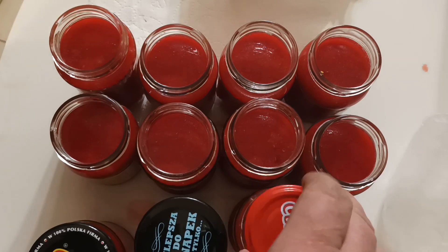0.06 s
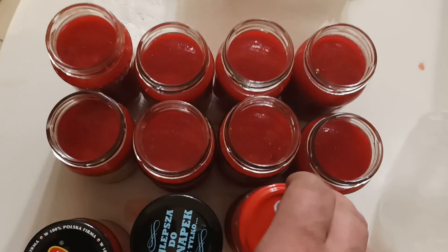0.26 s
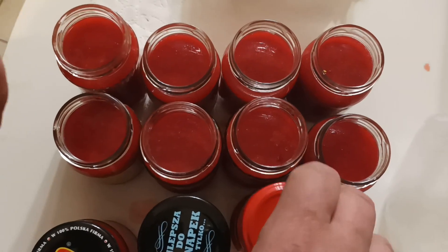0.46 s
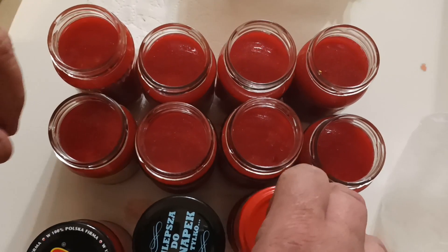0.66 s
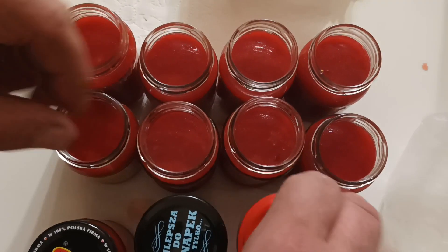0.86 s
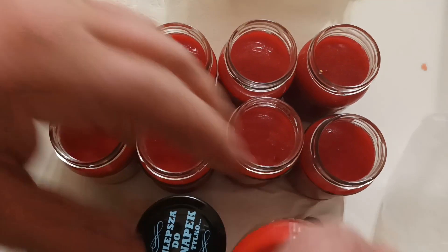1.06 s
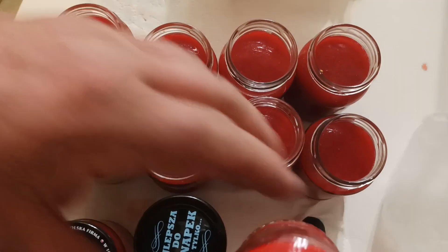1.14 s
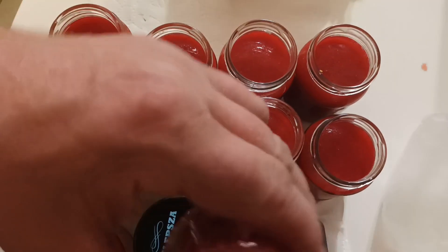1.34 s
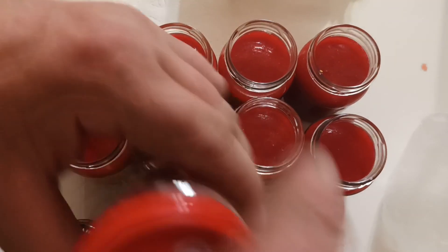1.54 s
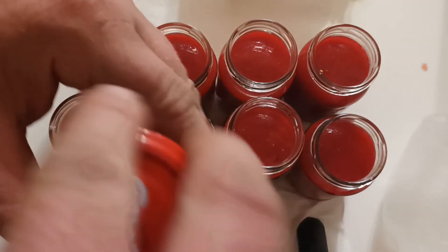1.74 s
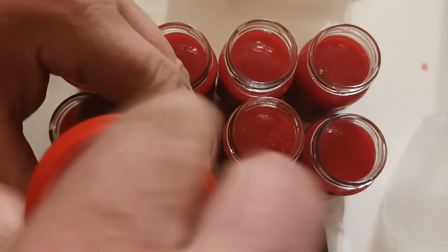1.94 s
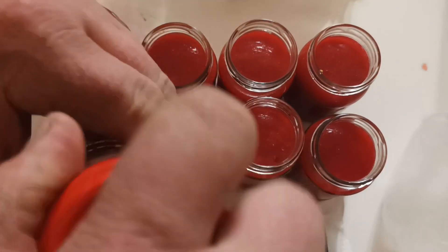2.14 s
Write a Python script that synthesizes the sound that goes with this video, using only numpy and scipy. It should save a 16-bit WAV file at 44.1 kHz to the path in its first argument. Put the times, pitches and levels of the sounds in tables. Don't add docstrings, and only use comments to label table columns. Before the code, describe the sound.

A tin lid clatters onto a small full glass jar, then is twisted on with hollow clicks

```python
import sys
import numpy as np
from scipy import signal
from scipy.fft import rfft, irfft
from scipy.io import wavfile
from scipy.ndimage import map_coordinates

SR = 44100
rng = np.random.default_rng(int(sys.argv[2]) if len(sys.argv) > 2 else 0)


def gain_from_decibels(decibels):
    exponent = np.asarray(decibels, float) / 20
    return 10 ** exponent


def int16_out(signal):
    q = np.round(np.clip(np.atleast_2d(signal).T, -1, 1) * 32767)
    wavfile.write(sys.argv[1], SR, q.astype(np.int16))


N = 97020
RIM_HZ = 3060
DROP_LAG_S, CATCH_LAG_S = 0.00012, 0.00024
DROP_PAN_DB, CATCH_PAN_DB = -1.5, 4


def unit(x):
    return x / np.sqrt(np.mean(x ** 2))


def band(x, hz, width_hz):
    return signal.lfilter(*signal.iirpeak(min(hz, .45 * SR), hz / width_hz, fs=SR), x)


def low(x, hz):
    return signal.sosfilt(signal.butter(2, hz, fs=SR, output="sos"), x)


def high(x, hz):
    return signal.sosfilt(signal.butter(2, hz, "high", fs=SR, output="sos"), x)


def noise(*shape):
    return rng.standard_normal(shape)


def seconds(count):
    return np.arange(count) / SR


def curve(points):
    return gain_from_decibels(np.interp(seconds(N), *np.array(points).T))


def ports(x, pan_db, lag_s):
    late = map_coordinates(x, [np.arange(len(x)) - lag_s * SR], order=3)
    return np.array([x * gain_from_decibels(pan_db / 2), late * gain_from_decibels(-pan_db / 2)])


def add(out, s, sound):
    i = int(s * SR)
    out[..., i:i + sound.shape[-1]] += sound[..., :N - i]


def blip(hz, die_s):
    t = seconds(SR // 20)
    return np.e * t / die_s * np.exp(-t / die_s) * np.sin(2 * np.pi * hz * t)


def knocks(contacts, die_s, lag_s, pan_db):
    out = np.zeros(N)
    for s, peak_db, hz in contacts:
        add(out, s, gain_from_decibels(peak_db + 3.5) * (blip(hz, die_s) + 0.058 * blip(0.74 * hz, 3.8 * die_s)))
    return ports(high(high(out, 647), 647), pan_db, lag_s)


def lid_drop():
    # t/s, peak level/dB, hollow pitch f/Hz
    drops = [(0.041, -27, 1323), (0.0415, -30.5, 720), (0.097, -39, 1270), (0.15, -48, 1250),
             (0.17, -41.5, 1550), (0.183, -43, 890), (0.187, -41, 1000), (0.192, -37, 1220),
             (0.212, -13.5, 1360), (0.2135, -19.5, 860), (0.216, -19.5, 1025), (0.217, -20.5, 1250),
             (0.2195, -27.5, 980), (0.23, -15, 1367), (0.237, -21.5, 1040), (0.24, -27, 1390),
             (0.242, -24, 920), (0.25, -37, 930), (0.338, -16.5, 1213), (0.388, -59, 1240),
             (0.417, -39, 1170), (0.446, -17, 987), (0.502, -41, 1050), (0.672, -49, 1180),
             (0.69, -50, 1210), (0.72, -50, 1060), (0.738, -49.5, 1260), (0.8, -49, 900),
             (0.935, -51, 1000)]
    return knocks(drops, 0.0011, DROP_LAG_S, DROP_PAN_DB)


def thread_catches():
    # t/s, peak level/dB, hollow pitch f/Hz
    catches = [(1.193, -42, 950), (1.259, -32.5, 943), (1.414, -40.5, 1020), (1.471, -70, 900),
               (1.481, -34, 1150), (1.486, -27.5, 1225), (1.492, -29.5, 986), (1.497, -46, 1040),
               (1.505, -63, 1090), (1.529, -62, 958), (1.637, -20.5, 1086), (1.65, -21, 1180),
               (1.701, -23.5, 1070), (1.705, -23.5, 850), (1.714, -21, 1180), (1.718, -23, 1084),
               (1.725, -11.5, 934), (1.737, -20, 1030), (1.744, -20.5, 920), (1.765, -49, 880),
               (1.772, -28, 990), (1.787, -25, 830), (1.794, -31.5, 854), (1.883, -36, 900),
               (1.888, -25.5, 1070), (1.895, -18.5, 884), (1.904, -18, 870), (1.91, -15.5, 890),
               (1.917, -20, 903), (1.921, -24.5, 885), (1.931, -17.5, 1007), (1.935, -19, 1253),
               (1.964, -46, 1160)]
    return knocks(catches, 0.0012, CATCH_LAG_S, CATCH_PAN_DB)


def strike_tin(blows, modes, crack_db, wash_db, wash_t60_s=0.41):
    shimmer_db, shimmer_width_hz = 11, 300
    out, t = np.zeros((2, N)), seconds(SR // 3)
    hz, db, t60_s = np.array(modes).T[:, :, None]
    for (s, peak_db, ring), chance in zip(blows, noise(len(blows), 4, len(modes), 1)):
        weight, *phases, detune = chance
        fade = gain_from_decibels(db + 1.5 * weight - 60 * t / np.clip(t60_s * ring, .01, .3))
        for ear, phase in enumerate(phases):
            pair = np.sin(2 * np.pi * hz * t + phase)
            pair = pair + 0.32 * np.sin(2 * np.pi * hz * (1 + 0.0058 * detune) * t)
            blur = [band(v, f, shimmer_width_hz) for v, f in zip(noise(*pair.shape), hz[:, 0])]
            rung = np.sum(fade * (pair + gain_from_decibels(shimmer_db) * np.array(blur)), axis=0)
            add(out[ear], s, gain_from_decibels(peak_db - 8.5) * rung * np.minimum(t / 0.00053, 1))
        crack = gain_from_decibels(crack_db - 60 * t / 0.0069) + gain_from_decibels(wash_db - 60 * t / (wash_t60_s * ring))
        add(out, s, gain_from_decibels(peak_db) * crack * band(noise(2, len(t)), 5000, 10000))
    return out


def clinks():
    # t/s, peak level/dB, ring share [0-1]
    blows = [
        (0.2111, -20, 0.98),
        (0.2297, -39, 0.6),
        (0.2356, -27.5, 0.87),
        (0.4475, -39.5, 0.08),
    ]
    # f/Hz, level/dB, t60/s
    modes = [(1876, -13, 0.23), (2220, -11, 0.12), (2963, -4.5, 0.13), (3087, -9.5, 0.41),
             (3295, -13, 0.13), (4530, -12.5, 0.2), (5440, -1.5, 0.1), (5884, -16, 0.26),
             (6620, -12.5, 0.18), (7370, -5, 0.11), (9080, -20.5, 0.26), (10800, -8, 0.078),
             (11300, -17, 0.26), (13780, -19, 0.062)]
    return strike_tin(blows, modes, crack_db=-13, wash_db=-20.5)


def first_touch():
    # t/s, peak level/dB, ring share [0-1]
    blows = [
        (0.0414, -28, 0.48),
    ]
    # f/Hz, level/dB, t60/s
    modes = [(865, -17, 0.24), (1693, -0.5, 0.26), (2150, 0, 0.064), (2870, 2, 0.1), (4650, 0.5, 0.079),
             (5360, 2.5, .1), (5860, -14, 0.19), (5992, -11, 0.19), (7170, -8.5, 0.2), (11000, 0.5, 0.083),
             (11090, -17.5, 0.16), (14000, -9, 0.1)]
    return strike_tin(blows, modes, crack_db=-17, wash_db=-18.5)


def dome():
    # t/s, peak level/dB
    blows = [
        (0.0423, -55.5),
        (0.2115, -33),
        (0.2289, -38),
        (0.339, -45),
        (0.444, -49.5),
    ]
    # f/Hz, level/dB, t60/s
    modes = [(150.3, -11.5, 0.32), (212.4, -10, 0.24), (917, -5, 0.27), (996, 2, 0.31), (1090, -1, .26),
             (1335, -3.5, 0.47), (1510, -2, 0.16), (1624, -19, .25)]
    out, t = np.zeros(N), seconds(SR // 2)
    hz, db, t60_s = np.array(modes).T[:, :, None]
    for (s, peak_db), (weight, phase) in zip(blows, noise(len(blows), 2, len(modes), 1)):
        fade = gain_from_decibels(peak_db + db + 2.0 * weight - 60 * t / t60_s)
        hum = np.sum(fade * np.sin(2 * np.pi * hz * t + phase), axis=0)
        add(out, s, hum * np.minimum(t / 0.0036, 1))
    return ports(out, DROP_PAN_DB, DROP_LAG_S)


def grind():
    # t/s, level/dB
    effort = [(0, -69), (.05, -81), (.2, -50), (.215, -30), (.33, -43), (.5, -51.5), (.75, -64),
              (1.05, -67.5), (1.4, -65.5), (1.48, -45.5), (1.56, -70), (1.66, -41.5), (1.72, -38),
              (1.8, -47), (1.87, -54), (1.91, -34), (1.97, -46.5), (2.06, -102)]
    # f/Hz, width/Hz, level/dB
    hollow_modes = [(902, 54, 15.5), (1031, 145, 11.5), (1270, 35, 12.5)]
    slips_per_s, spread_db, grit_db = 1100, 4, -23
    slips = (rng.random(N) < slips_per_s / SR) * gain_from_decibels(spread_db * noise(N)) * np.sign(noise(N))
    hollow = sum(gain_from_decibels(db) * band(band(slips, hz, width_hz), hz, 530) for hz, width_hz, db in hollow_modes)
    hollow = high(hollow, 690)
    grit = band(band(slips, RIM_HZ, 55), RIM_HZ, 320)
    return ports(curve(effort) * (unit(hollow) + gain_from_decibels(grit_db) * unit(grit)), 2.2, CATCH_LAG_S)


def ticks():
    # t/s, peak level/dB, f/Hz
    scrapes = [(.171, -46.5, 2250), (.503, -50.5, 2300), (0.543, -39, 2000), (.582, -67, 9500),
               (.593, -47, 2390), (.858, -64, 6760), (1.272, -64, 6300), (1.297, -58, 6900),
               (1.486, -50, 5170), (1.635, -66, 5900), (1.649, -44.5, 6200), (1.648, -48, 3300),
               (1.695, -48, 2220), (1.717, -50, 5600), (1.724, -31.5, 3080), (1.7236, -37, 4380),
               (1.723, -38, 6000), (1.738, -41, 6200), (1.911, -46, 2480), (1.915, -52, 6030),
               (1.925, -45, 5670), (1.932, -40, 2320), (1.941, -48.5, 6800), (1.947, -39, 2270),
               (1.969, -46, 2400), (2.052, -46, 2880), (2.136, -51, 9100)]
    # t/s, peak level/dB, t60/s
    rim_rings = [
        (.545, -59, .5),
        (.595, -62, .4),
        (1.655, -57, .15),
        (1.737, -47, .3),
        (1.91, -56, .15),
    ]
    out, t = np.zeros(N), seconds(SR // 6)
    for s, peak_db, hz in scrapes:
        grit = noise(len(t)) * gain_from_decibels(-60 * t / .012) * np.minimum(t / 0.00068, 1)
        tick = band(band(grit, hz, 930), hz, 1400)
        tick = tick + .5 * band(band(grit, RIM_HZ, 30), RIM_HZ, 800)
        tick = tick + hz / 60000 * band(grit, 7600, 4000)
        add(out, s, gain_from_decibels(peak_db + 9.5) * tick / np.abs(tick).max())
    for s, peak_db, t60_s in rim_rings:
        pair = np.sin(2 * np.pi * RIM_HZ * t) + 0.78 * np.sin(2 * np.pi * 0.89 * RIM_HZ * t)
        add(out, s, gain_from_decibels(peak_db - 60 * t / t60_s) * pair * np.minimum(t / 0.0026, 1) * (1 - t / t[-1]))
    return ports(out, -0.63, .0001)


def snaps():
    # t/s, peak level/dB, centre f/Hz, rustle level/dB, rustle t60/s
    table = [
        (1.104, -55, 2150, -22, 0.24),
        (1.106, -43.5, 680, -6, 0.23),
        (1.184, -56, 11000, -18, .1),
        (1.3156, -30, 8800, -16, 0.28),
        (2.053, -42.5, 2460, -4, 1.4),
        (2.14, -16.5, 11000, -22.5, 0.31),
    ]
    die_s, edge_db, edge_s = 0.0066, -4.5, .004
    out, t = np.zeros((2, N)), seconds(SR // 2)
    for s, peak_db, hz, rustle_db, t60_s in table:
        crack = band(band(noise(len(t)) * gain_from_decibels(-60 * t / die_s), hz, 0.45 * hz), hz, 0.45 * hz)
        edge = high(high(noise(len(t)), 8500), 9000) * gain_from_decibels(edge_db - 60 * t / edge_s)
        crack = crack / np.abs(crack).max() + hz / 11000 * edge
        hiss = noise(3, len(t))
        hiss = hiss[:2] + hiss[2]
        hiss = hiss * gain_from_decibels(2.34 * unit(low(noise(len(t)), 110)))
        top_hz = 3000 + 0.45 * hz
        rustle = 0.87 * band(band(hiss, hz, .5 * hz), hz, hz)
        rustle = rustle + 1.15 * low(low(band(hiss, 3040, 5100), top_hz), top_hz)
        rustle = rustle + 1.93 * band(hiss, 580, 390)
        rustle = rustle + hz / 16000 * high(high(hiss, 11500), 11500)
        rustle = rustle * gain_from_decibels(rustle_db - 60 * t / t60_s) * np.minimum(t / 0.001, 1)
        crack = ports(crack / np.abs(crack).max(), 6.4, 0.00015)
        add(out, s, gain_from_decibels(peak_db + 1.5) * (crack + rustle))
    return out


def thumps():
    # t/s, peak level/dB, f/Hz
    blows = [(0.041, -40, 320), (0.171, -41.5, 410), (0.212, -23, 540), (0.23, -40, 530),
             (0.543, -36.5, 129), (0.593, -34, 142), (0.608, -38.5, 159), (1.631, -45.5, 157),
             (1.694, -33, 320), (1.723, -37, 290), (1.937, -34.5, 227), (2.091, -45, 290),
             (2.142, -43.5, 430), (2.162, -38.5, 386)]
    die_cycles, rough_db, rough_t60_s = 0.36, -8, 0.15
    out, t = np.zeros(N), seconds(SR // 20)
    for s, peak_db, hz in blows:
        rough = unit(low(band(noise(len(t)), 1.56 * hz, 1.8 * hz), 1500))
        rough = rough * gain_from_decibels(rough_db - 60 * t / rough_t60_s)
        add(out, s, gain_from_decibels(peak_db) * (blip(hz, die_cycles / hz) + rough))
    return ports(high(out, 89), 2.4, 0.000055)


def slide():
    # t/s, level/dB
    rub = [(1.05, -105), (1.12, -70), (1.2, -73), (1.42, -69), (1.5, -56), (1.53, -85), (1.69, -69),
           (1.73, -44), (1.82, -102), (1.89, -89), (1.93, -48), (1.98, -62), (2.2, -51)]
    hiss = noise(2, N) * gain_from_decibels(2.1 * unit(low(noise(N), 250)))
    body = band(band(hiss, 6300, 11600), 6300, 4400)
    return curve(rub) * unit(body + 0.42 * band(hiss, 10200, 1700) + .5 * band(hiss, 2200, 1300))


def palm():
    # t/s, level/dB, squeak f/Hz
    drag = [(2.051, -80, 608), (2.075, -54, 477.5), (2.1, -51, 299.4), (2.136, -51.5, 398.3),
            (2.145, -41.5, 444), (2.169, -55, 478), (2.2, -48, 390)]
    s, db, hz = np.array(drag).T
    t = seconds(N)
    pitch_hz = np.interp(t, s, hz) * (1 + 0.055 * unit(low(noise(N), 90)))
    phase = 2 * np.pi * np.cumsum(pitch_hz) / SR
    tone = sum(gain_from_decibels(-7. * k) * np.sin((k + 1) * phase) for k in range(6))
    level_db = np.interp(t, s, db, left=-120) + 3.2 * unit(low(noise(N), 106))
    return ports(gain_from_decibels(level_db) * tone, 1.9, 0.00033)


def sleeve():
    # t/s, level/dB
    brush = [(.58, -95), (.68, -65.5), (.76, -62), (.84, -68), (.97, -79)]
    centre_hz, width_hz = 10500, 2800
    hiss = band(band(noise(2, N), centre_hz, width_hz), centre_hz, width_hz)
    return curve([(0, -120), *brush, (N / SR, -120)]) * unit(hiss)


def room(x):
    level_db, t60_s, treble_t60_s, split_hz = -10.5, 0.34, 0.26, 8200
    t = seconds(SR // 2)
    echo = noise(2, len(t)) * np.clip((t - .003) / 0.001, 0, 1)
    bass = low(echo, split_hz)
    tail = bass * gain_from_decibels(-60 * t / t60_s) + (echo - bass) * gain_from_decibels(-60 * t / treble_t60_s)
    tail = tail / np.sqrt(np.sum(tail ** 2) / 2)
    return gain_from_decibels(level_db) * signal.fftconvolve(x, tail, axes=1)[:, :N]


def kitchen():
    # f/Hz, level/dB per Hz
    spectrum = [(40, -6.5), (130, -5.5), (300, -7), (900, -18.5), (2800, -20.5), (5200, -31), (10500, -34),
                (15000, -45.5)]
    # t/s, level/dB
    bustle = [(0, -2.5), (.15, 2.5), (.6, 5), (.8, 5), (1.04, -1.5), (1.13, 2.5), (1.6, 0), (2.0, 5.5),
              (2.2, 2)]
    level_db, wander_db, wander_hz = -59, 1.2, 12
    hz = np.maximum(np.arange(N // 2 + 1) * SR / N, 1)
    point_hz, point_db = np.array(spectrum).T
    shape = gain_from_decibels(np.interp(np.log(hz), np.log(point_hz), point_db))
    mid, side = rfft(noise(2, N))
    side = side * np.clip(.5 + hz / 3000 + 30 / hz, 0, 1)
    tone = unit(irfft(shape * np.array([mid + side, mid - side]), N))
    return gain_from_decibels(level_db + wander_db * unit(low(noise(N), wander_hz))) * curve(bustle) * tone


def scene():
    near = lid_drop() + thread_catches() + clinks() + first_touch() + dome() + grind()
    near = near + ticks() + snaps() + thumps() + slide() + palm() + sleeve()
    return near + room(near) + kitchen()


def band_limit(x):
    return signal.sosfilt(signal.butter(12, 16700, fs=SR, output="sos"), x)


def record(dry):
    left, right = dry
    soft = low(right, 9300)
    right = gain_from_decibels(-2.5) * (soft + gain_from_decibels(-12) * (right - soft))
    mix = signal.sosfilt(signal.butter(8, 16500, fs=SR, output="sos"), np.array([left, right]))
    mix = low(high(mix, 77), 12640)
    return band_limit(mix)


dry = scene()
out = record(dry)
int16_out(out)
```